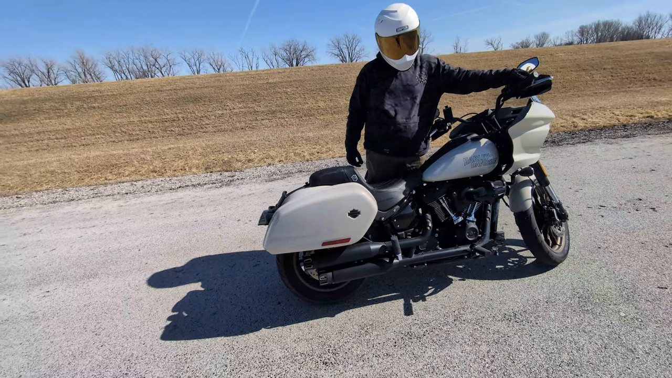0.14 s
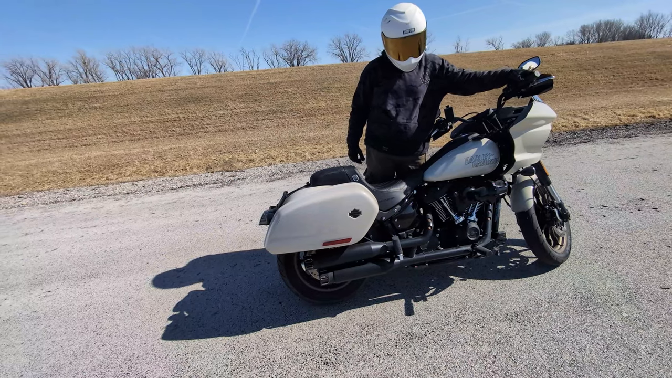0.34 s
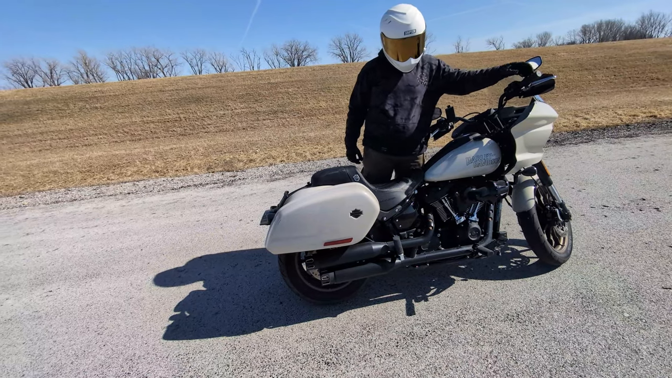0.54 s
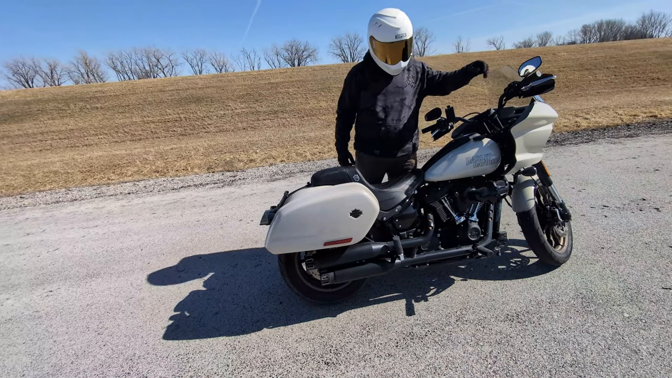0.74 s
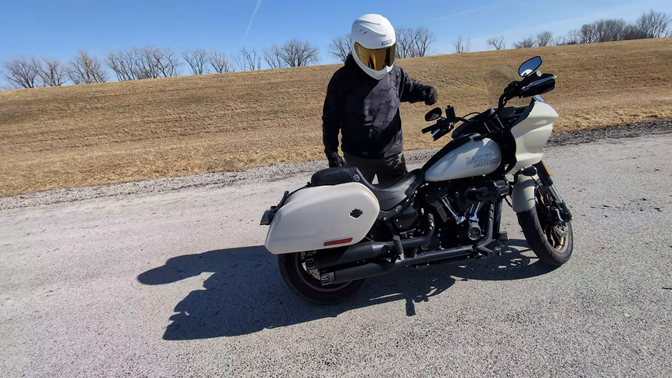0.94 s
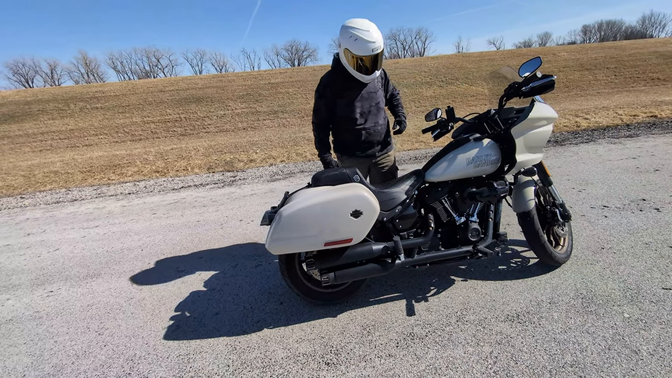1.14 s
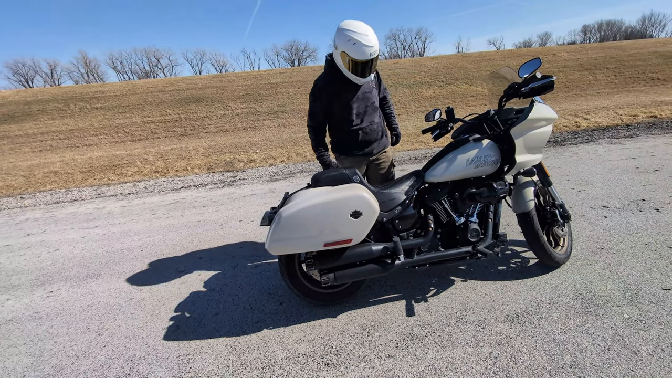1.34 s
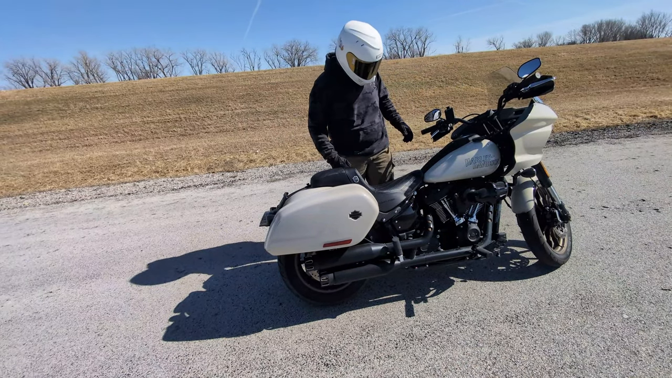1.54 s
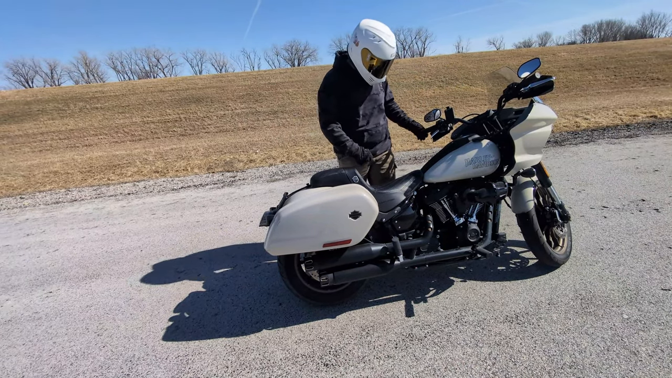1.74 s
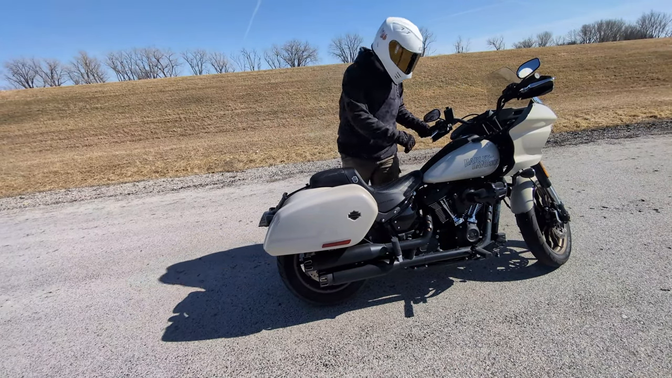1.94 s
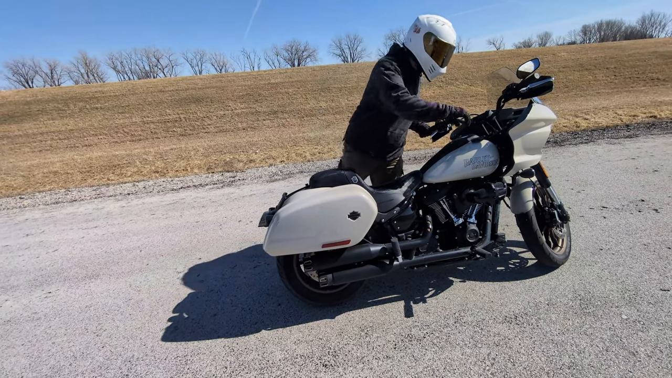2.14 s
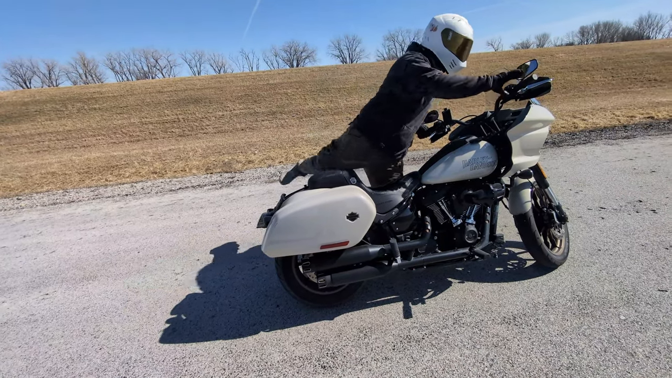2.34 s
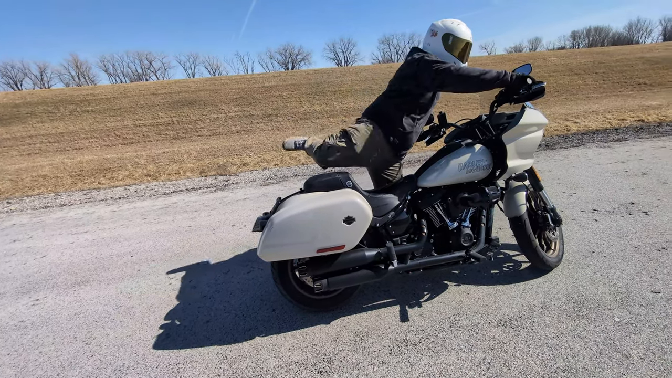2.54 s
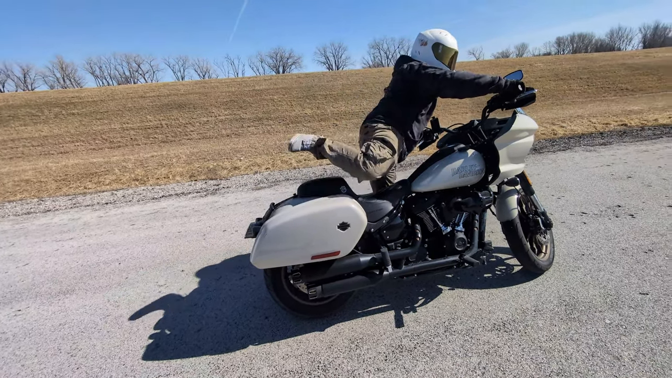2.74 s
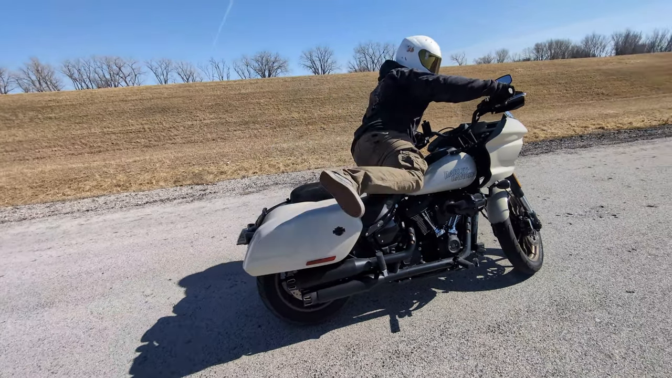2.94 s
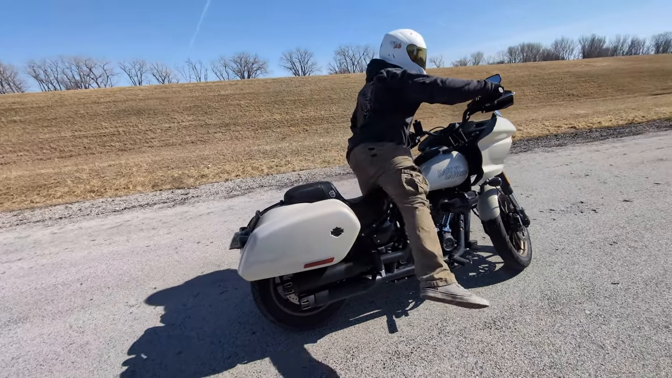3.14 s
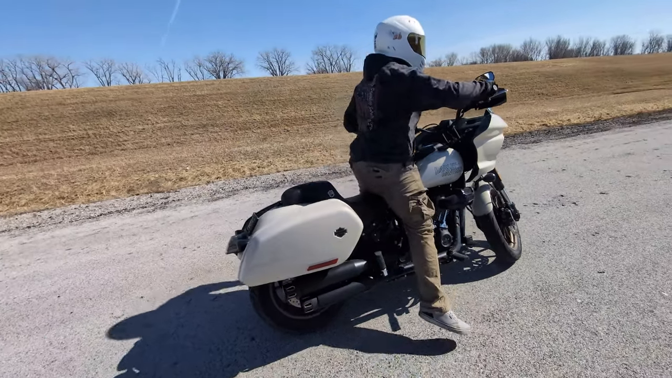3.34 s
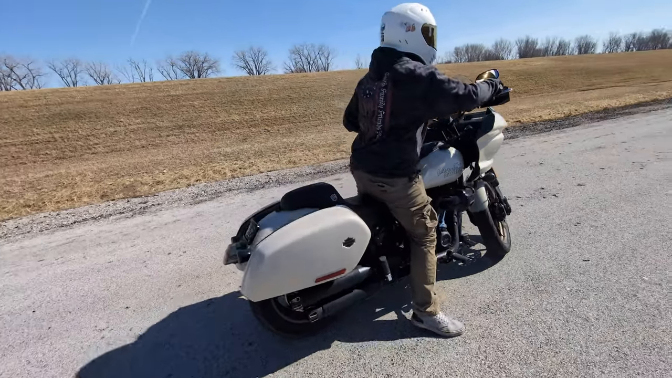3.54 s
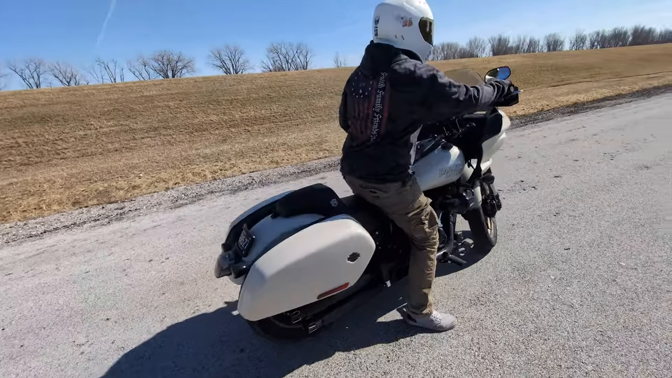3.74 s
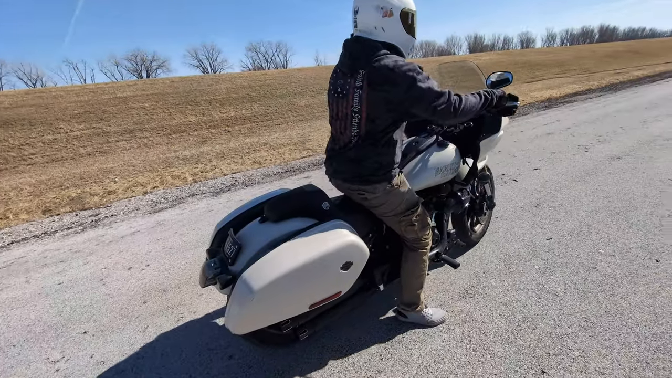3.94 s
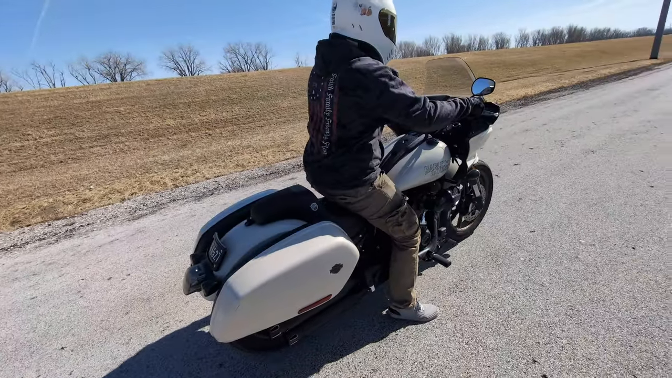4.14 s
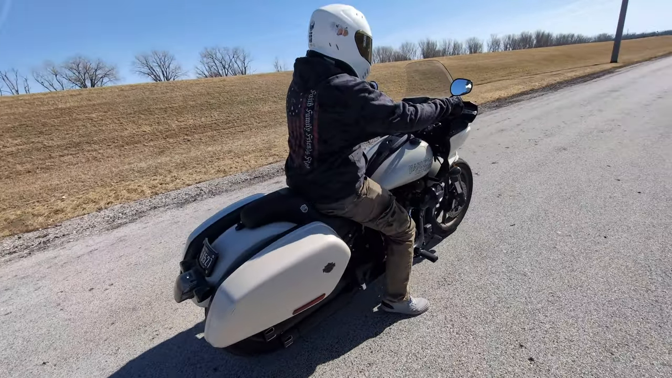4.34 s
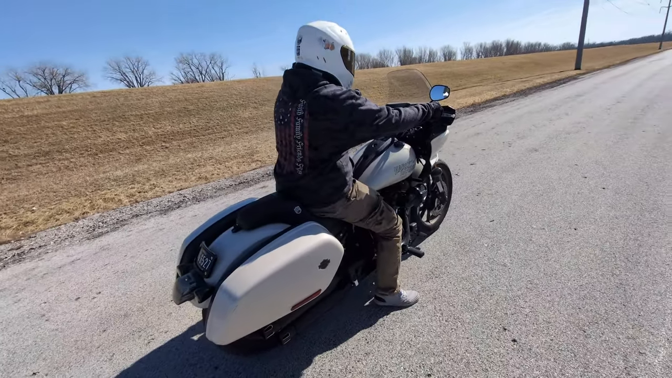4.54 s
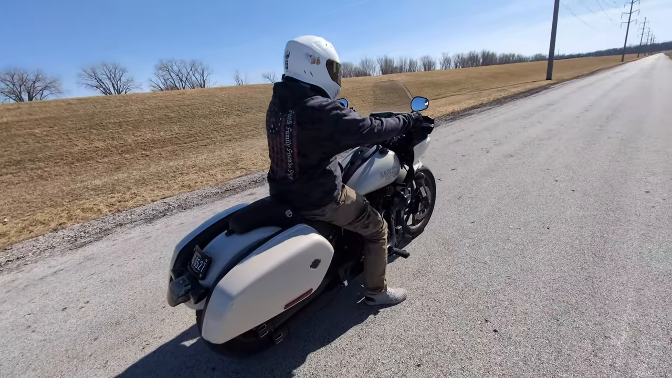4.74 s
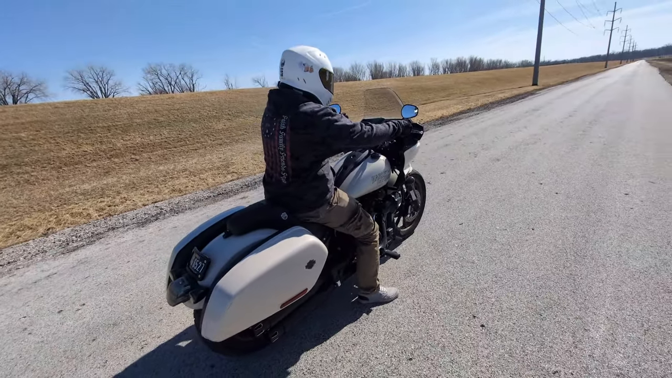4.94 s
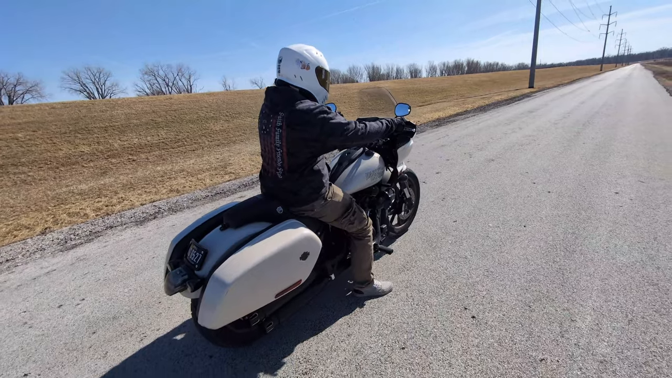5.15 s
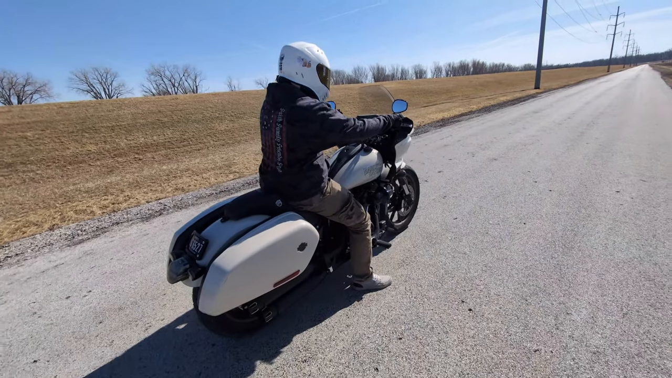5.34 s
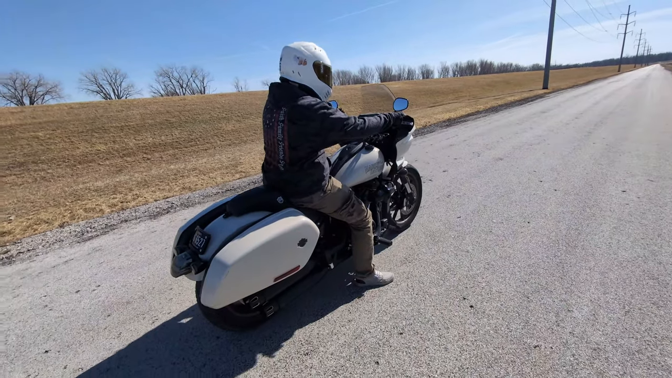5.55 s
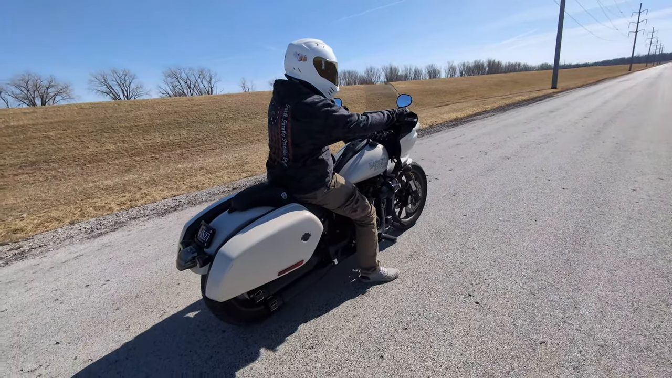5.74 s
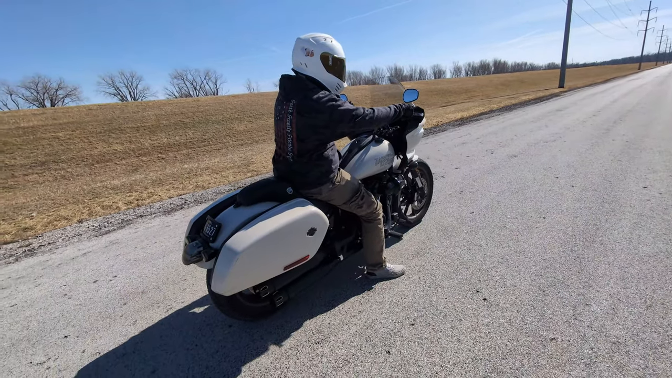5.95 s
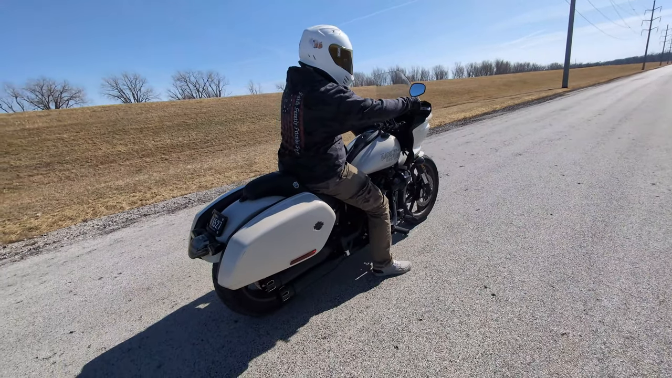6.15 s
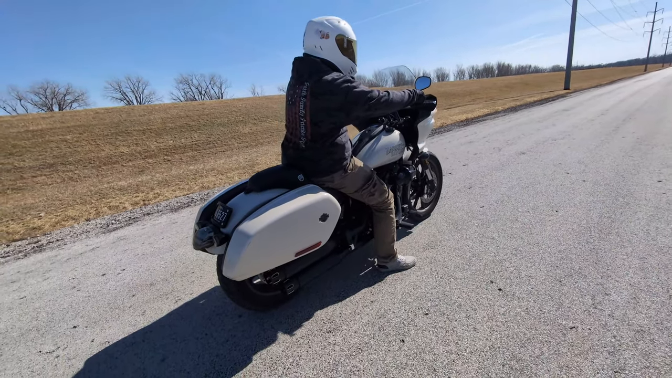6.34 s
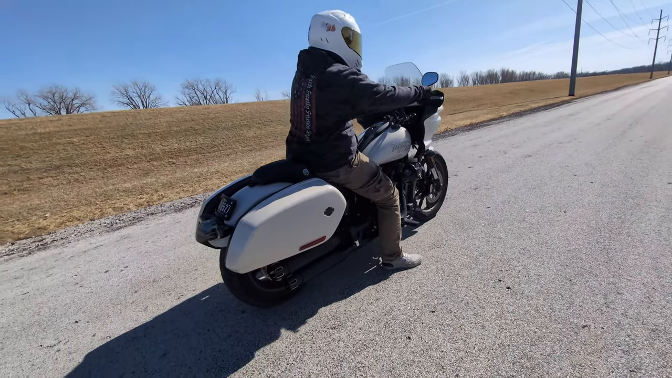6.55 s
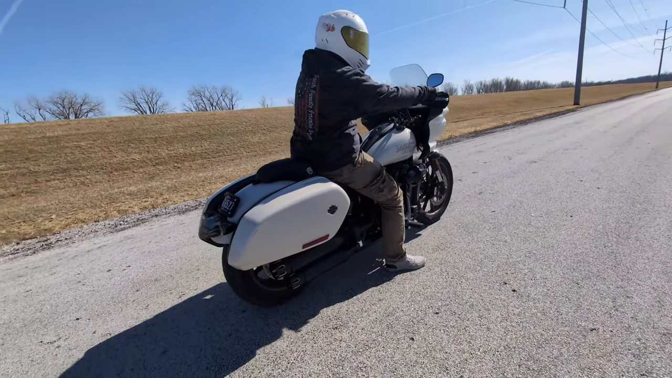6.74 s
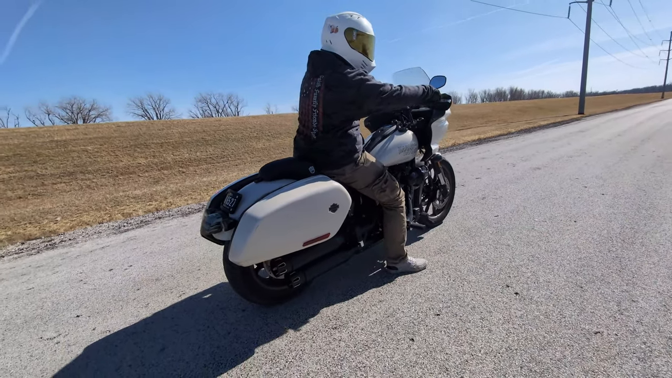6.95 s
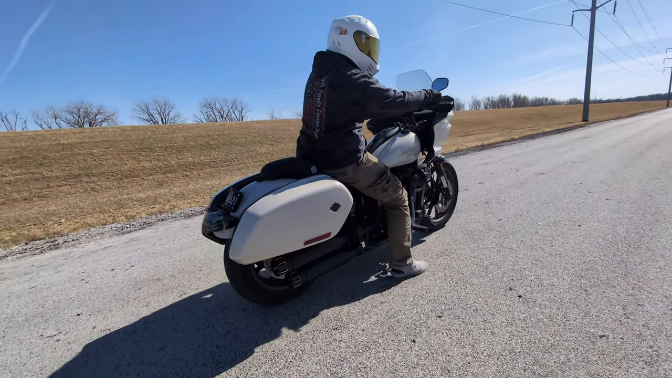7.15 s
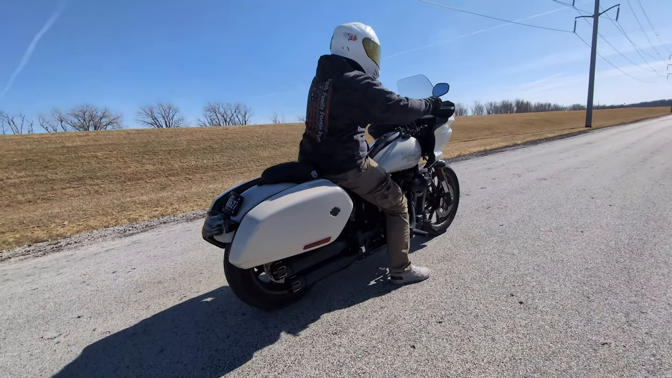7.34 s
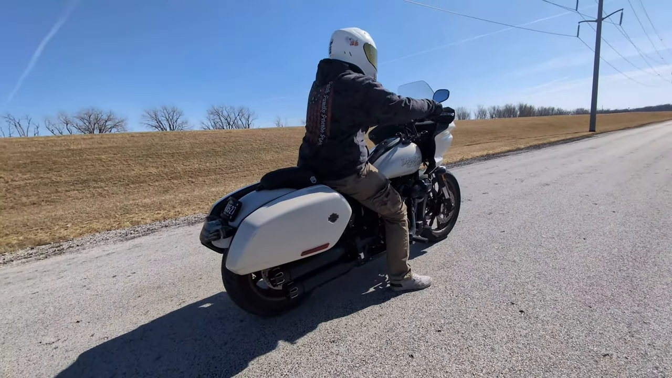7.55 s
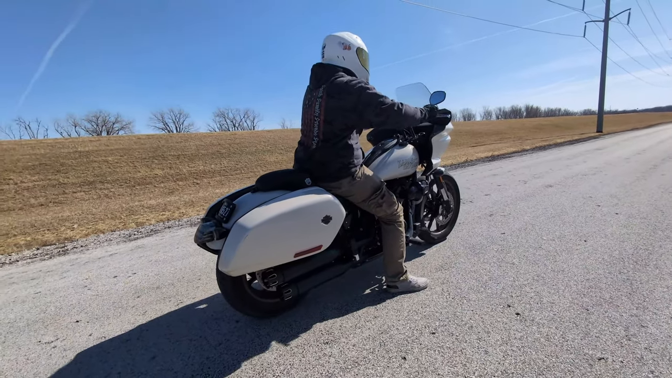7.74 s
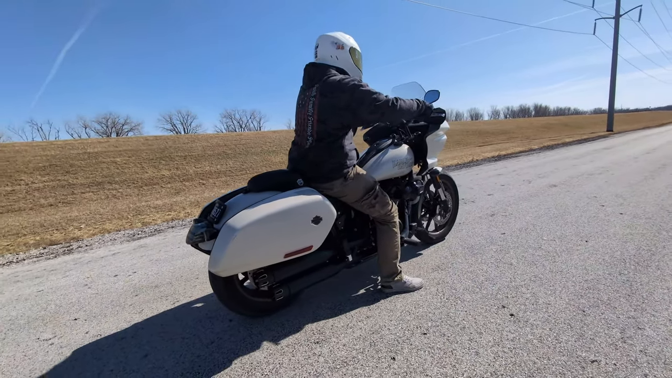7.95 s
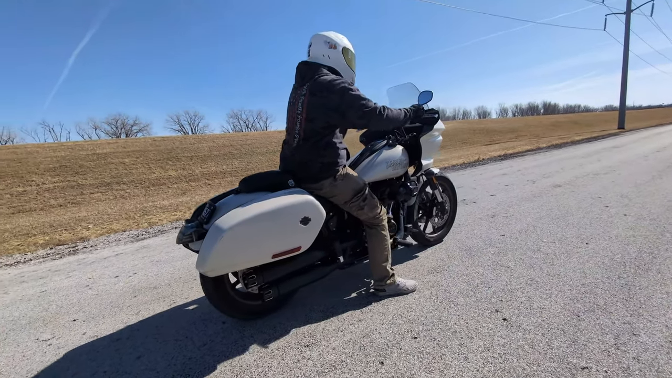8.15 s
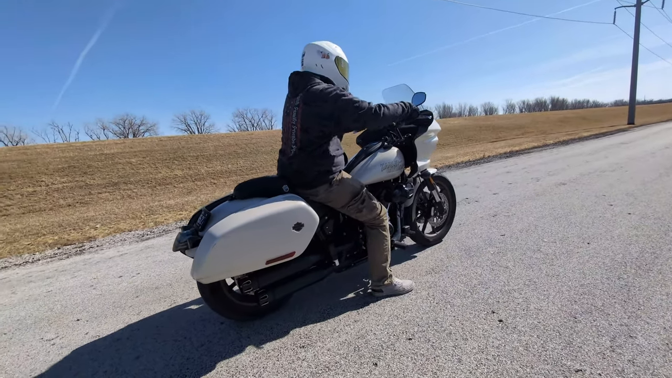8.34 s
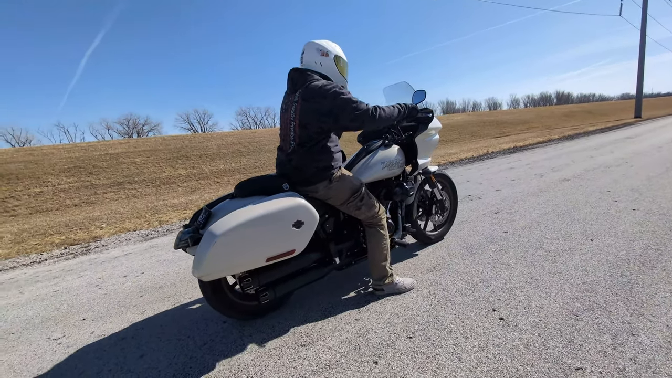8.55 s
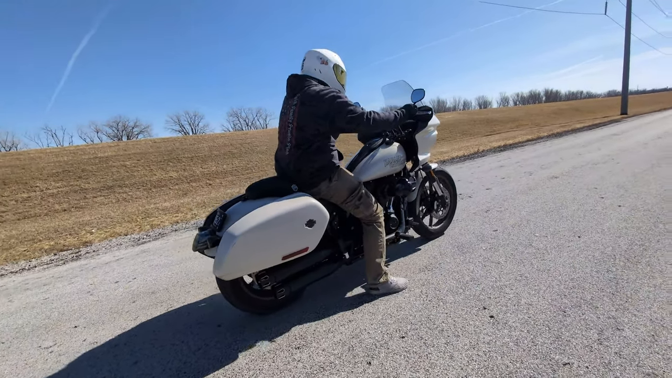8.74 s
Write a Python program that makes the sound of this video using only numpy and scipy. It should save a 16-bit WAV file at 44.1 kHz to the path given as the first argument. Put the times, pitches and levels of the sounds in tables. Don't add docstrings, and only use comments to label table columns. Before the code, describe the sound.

Loud, uneven motorcycle idle on an open road, with ticking valves, a gear clunk, crackling throttle blips and a short tyre squeal at pull-off.

```python
import sys
import numpy as np
from scipy import signal
from scipy.fft import rfft, irfft, next_fast_len
from scipy.io import wavfile
from scipy.ndimage import uniform_filter1d

SR = 44100
rng = np.random.default_rng(int(sys.argv[2]) if len(sys.argv) > 2 else 0)


def store_pcm(level_fs):
    pcm = np.round(np.clip(level_fs, -1, 1) * 32767).astype(np.int16)
    wavfile.write(sys.argv[1], SR, np.atleast_2d(pcm).T)


def magnitude_from_level(level_db):
    exponent = np.asarray(level_db, float) / 20
    return 10 ** exponent


N = 392049
NOW_S = np.arange(N) / SR
OPPOSITE = np.array([[1], [-1]])


def at_hz(points, hz):
    points = np.array(points)
    return np.interp(np.log(hz), np.log(points[:, 0]), points[:, 1])


def colour(x, points):
    size = next_fast_len(N)
    hz = np.maximum(np.arange(size // 2 + 1) * SR / size, 1)
    return irfft(rfft(x, size) * magnitude_from_level(at_hz(points, hz)), size)[..., :N]


def in_time(rows):
    s, *columns = np.transpose(rows)
    return [np.interp(NOW_S, s, column) for column in columns]


def even(x, window_s):
    power = np.mean(np.atleast_2d(x) ** 2, axis=0)
    size = int(window_s * SR)
    slow_power = uniform_filter1d(uniform_filter1d(power, size), size)
    return x / np.sqrt(slow_power + 1e-12)


def filtered(x, order, hz, kind):
    return signal.sosfiltfilt(signal.butter(order, hz, kind, fs=SR, output="sos"), x)


def high_pass(x, hz):
    return signal.sosfilt(signal.butter(3, hz, "high", fs=SR, output="sos"), x)


def clicks(times, heights):
    at = np.round(np.asarray(times) * SR).astype(int)
    inside = (at >= 0) & (at < N)
    return np.bincount(at[inside], np.asarray(heights)[inside], N) + 1e-18


def ring(x, hz, t60):
    r, w = magnitude_from_level(-60 / (t60 * SR)), 2 * np.pi * hz / SR
    return signal.lfilter([0, np.sin(w)], [1, -2 * r * np.cos(w), r * r], x)


def ring_all(x, modes):
    return sum(magnitude_from_level(level_db) * ring(x, hz, t60) for hz, level_db, t60 in modes)


def swell(x, rise_ms, decay_ms):
    rise, decay = np.exp(-1000 / (rise_ms * SR)), np.exp(-1000 / (decay_ms * SR))
    return signal.lfilter([1 - rise], [1, -rise], signal.lfilter([1], [1, -decay], x))


def flicker(rate_hz):
    slow = rng.standard_normal(int(N / SR * 60) + 2)
    slow = np.interp(NOW_S * np.clip(rate_hz, 1, 59), np.arange(len(slow)), slow)
    return slow / slow.std()


def unsteady(hz, t60, window_s):
    return even(ring(rng.standard_normal(N), hz, t60), window_s)


# pitch_hz, likeness [-1 to 1]
EAR_LIKENESS = [(200, 0.96), (600, 0.9), (1200, 0.59), (2200, 0.11), (4000, -0.25), (9000, -0.12),
                (15000, 0.15)]


def stereo_noise(points):
    hz, alike = np.transpose(EAR_LIKENESS)
    alike = np.clip(alike, -.95, .99)
    mid, side = colour(rng.standard_normal((2, N)), points)
    mid = colour(mid, np.c_[hz, 10 * np.log10(1 + alike)])
    side = colour(side, np.c_[hz, 10 * np.log10(1 - alike)])
    return even(np.array([mid + side, mid - side]), 7.3)


def knocks(rows, t60, burst_ms, trim_db):
    out, size = np.zeros((2, N + SR)), SR // 10
    fade = np.exp(-1000 * np.arange(size) / SR / burst_ms)
    for s, peak_db, hz in rows:
        grit = rng.standard_normal((2, size)) * fade
        rung = ring(grit[0] + 0.32 * grit[1] * OPPOSITE, hz, t60)
        first = int(s * SR)
        out[:, first:first + size] += magnitude_from_level(peak_db + trim_db) * rung / np.abs(rung).max()
    return out[:, :N]


# time_s, cycles per second [Hz]; one cycle is two turns of the crank
ENGINE_SPEED = [(0.0, 14.701), (0.3, 12.264), (0.515, 22.829), (1.37, 13.475), (2.01, 8.383), (2.35, 8.303),
                (2.69, 8.465), (3.02, 8.158), (3.36, 8.366), (3.69, 8.016), (4.03, 8.385), (4.36, 8.148),
                (4.7, 8.131), (5.04, 8.14), (5.37, 8.024), (5.71, 8.223), (6.04, 8.104), (6.38, 7.953),
                (6.71, 8.0), (7.05, 8.114), (7.36, 7.994), (7.455, 13.377), (7.815, 14.132), (7.905, 20.73),
                (8.143, 18.03), (8.206, 24.095), (8.242, 18.636), (8.284, 23.634), (8.448, 29.558),
                (8.672, 27.71), (8.694, 20.779), (8.9, 23.206)]


def crank():
    speed, = in_time(ENGINE_SPEED)
    return np.cumsum(speed) / SR, speed


FRONT_LAG = .4375


def cycles():
    turns = crank()[0]
    starts = np.interp(np.arange(int(turns[-1]) + 1), turns, NOW_S)
    length = np.diff(starts, append=2 * starts[-1] - starts[-2])
    return starts, length, np.clip((1 / length - 8.8) / 3, 0, 1)


# share of the cycle, idle_db, speed_db, spread_db, decay_ms
GAS_PUFFS = [(0.024, 11.5, 4, 6, 3.9), (0.404, 6.5, 3, 13, 10), (.12, 2, -8, 12, 4.4),
             (0.1, -35, -27, -24, 1.1), (0.9, 1, -38, 23, 14)]


def puff_gate():
    start, length, heat = cycles()
    gate = 0
    for share, idle_db, speed_db, spread_db, decay_ms in GAS_PUFFS:
        chance_db = np.clip(spread_db, 1, 4) * rng.standard_normal(len(start))
        size_db = idle_db + heat * (speed_db - idle_db) + chance_db
        point = share + 0.05 * heat * (share > 0)
        gate = gate + swell(clicks(start + point * length - .005, magnitude_from_level(size_db)), 0.57, decay_ms)
    return gate


# pitch_hz, level_db, t60_s
COOLING_FINS = [(4300, -22, .008), (5500, -15, .008), (5800, -18, .008), (8140, -21, .005),
                (9500, -18, .005)]


def fins():
    white = rng.standard_normal((2, N))
    out = 0
    for hz, level_db, t60 in COOLING_FINS:
        rung = ring(white, hz, t60)
        out = out + magnitude_from_level(level_db + 3.4 * flicker(14)) * rung / rung.std()
    return out


# pitch_hz, level_db
HISS_SPECTRUM = [(1470, 1), (2500, -3), (3690, -8), (5480, -5.5), (6760, -7.5), (7650, -7.5), (8660, -12.5),
                 (11600, -4), (15200, -13), (16000, -4)]
# cycle rate [Hz], level_db
HISS_LEVEL = [(8, -13), (11, -2), (20, 0.5), (28, -4)]
# time_s, level_db
FINS_SHOWING = [(0, -5), (3.2, 3), (4.5, -8), (8.89, -7)]


def hiss(gate, case_db):
    speed = crank()[1]
    rush = stereo_noise(HISS_SPECTRUM) + magnitude_from_level(in_time(FINS_SHOWING)[0]) * fins()
    swells = 1 + 0.33 * np.clip((speed - 10) / 5, 0, 1) * (even(gate, .12) - 1)
    return magnitude_from_level(case_db + at_hz(HISS_LEVEL, speed)) * rush * swells


# time_s, low_mesh_db, high_mesh_db, middle_mesh_db
GEAR_WHINE = [(.9, -130, -130, -130), (1.2, -72, -90, -90), (1.4, -64, -80, -82), (1.55, -62, -74, -69),
              (1.67, -62, -65, -76), (1.78, -54, -78, -90), (1.93, -63, -110, -110),
              (2.1, -130, -130, -130)]
MESHES_PER_CYCLE = [160.0, 500.0, 335.0]


def whine():
    out, turns = 0, crank()[0]
    for teeth, level_db in zip(MESHES_PER_CYCLE, in_time(GEAR_WHINE)):
        flutter = unsteady(45, 0.022, 1)
        tone = np.sin(2 * np.pi * teeth * turns + .8 * flutter)
        out = out + magnitude_from_level(level_db + 2.5) * (1 + .7 * flutter) * tone
    return out


# pitch_hz, level_db, t60_s
ENGINE_COVERS = [(1350, -25, 0.04), (2020, -34.5, 0.072), (2500, -35, 0.0067), (1133, -33, 0.076),
                 (2670, -38, .04)]
# pitch_hz, level_db per Hz
IDLE_CLATTER = [(140, 0.5), (230, 2), (270, -13), (340, -16), (410, -27), (490, -14), (650, -12.5),
                (700, -20), (741, -21), (904, -25.5), (1330, -19), (1540, -24), (2450, -28), (2880, -28.5),
                (4500, -38.5), (5850, -74), (9900, -120)]
# pitch_hz, level_db per Hz
REVVED_CLATTER = [(140, 6.5), (240, 7.5), (471, -15.5), (595, -1), (1440, -20.5), (1550, -11), (2210, -16),
                  (2410, -15), (2720, -16), (3230, -15.5), (4500, -38), (5850, -73), (9900, -120)]
# pitch_hz, level_db, t60_s
PIPE_MOUTH = [(675, -6, 0.035), (585, -7, 0.035), (3270, -20.5, 0.04), (3950, -22.5, 0.021)]
# share of the cycle, level_db
MOUTH_WAVES = [(.41, -6.5), (.76, -9), (0.0852, -14.5)]


def clatter(gate, clatter_db):
    start, length, heat = cycles()
    revved = np.interp(NOW_S, start, heat)
    white = rng.standard_normal((2, N))
    covers = 0
    for k, (hz, level_db, t60) in enumerate(ENGINE_COVERS):
        covers = covers + magnitude_from_level(level_db + 3 * flicker(22)) * even(ring(white[k % 2], hz, t60), 5.8)
    idle = stereo_noise(IDLE_CLATTER) + covers
    rattle = (1 - revved) * idle + revved * stereo_noise(REVVED_CLATTER)
    mouth = 0
    for hz, level_db, t60 in PIPE_MOUTH:
        for share, wave_db in MOUTH_WAVES:
            chance_db = rng.normal(0, 1.8, len(start))
            strength = (1 - heat) * magnitude_from_level(level_db + wave_db - 3.5 + chance_db)
            wave = swell(clicks(start + share * length, strength), 90 / hz, 220 / hz)
            mouth = mouth + ring(wave, hz, t60)
    mouth = high_pass(mouth, 470)
    shaken = .9 - .4 * revved + (.2 + .4 * revved) * even(gate, .12)
    return magnitude_from_level(clatter_db + 4.5) * (rattle * shaken + mouth)


# time_s, peak_db, pitch_hz
NEAR_VALVE_KNOCKS = [(2.2023, -51, 3050), (2.3255, -48, 2930), (2.566, -47, 2500), (2.802, -45, 2970),
                     (2.9232, -40, 3270), (3.0454, -48, 3120), (3.2874, -43, 2580), (3.3402, -39, 2840),
                     (3.409, -40, 3090), (3.4585, -45, 2580), (3.5285, -35.5, 3210), (3.5807, -38, 2610),
                     (3.6475, -45, 3320), (3.7753, -40, 2760), (3.827, -38, 3190), (3.8975, -39, 3100),
                     (4.0721, -35, 2920), (4.14, -39, 3240), (4.3085, -47, 2560), (4.5041, -40, 2600),
                     (4.555, -44, 2500), (4.6273, -40, 2720), (4.6812, -37, 2690), (5.2409, -51, 2820)]
# time_s, peak_db, pitch_hz
MORE_VALVE_KNOCKS = [(2.133, -42, 2640), (2.376, -46, 2510), (2.4448, -51, 3490), (2.6189, -43, 2900),
                     (2.9746, -46, 2580), (3.1677, -47, 3150), (4.0073, -47, 2580), (4.2577, -53, 2790),
                     (4.367, -43, 2570), (4.8035, -39, 2710), (4.875, -39, 2800), (5.4904, -36, 3290),
                     (5.6126, -40, 2720), (5.7334, -38, 3610), (5.8586, -37.5, 3330), (5.912, -42, 2580),
                     (5.9803, -46, 2580), (6.104, -37, 2540), (6.1559, -47, 2980), (6.2248, -42, 2800),
                     (6.354, -39, 3700), (6.4063, -44, 2730), (6.4787, -40, 3300), (6.6014, -35, 2780),
                     (6.6553, -35, 2820), (6.8543, -41, 3410), (6.9087, -39, 3050), (6.9795, -37, 3290),
                     (7.1023, -45, 3140), (7.1541, -33, 2770), (7.2245, -42, 2760), (7.2759, -40, 2990)]
# pitch_hz, level_db, t60_s
ROCKER_COVER = (3320, -8, 0.013)


def tappets():
    hz, level_db, t60 = ROCKER_COVER
    cover = [(s, db + level_db, hz) for s, db, _ in NEAR_VALVE_KNOCKS + MORE_VALVE_KNOCKS]
    out = knocks(NEAR_VALVE_KNOCKS, .025, 2.3, trim_db=-2.0)
    out = out + knocks(MORE_VALVE_KNOCKS, .025, 2.6, trim_db=-5.5)
    return out + knocks(cover, t60, 1.8, trim_db=0)


def metal_hits(hits, modes):
    s, peak_db, crack_db = np.transpose(hits)
    grit = rng.standard_normal((2, N))
    blow = swell(clicks(s, magnitude_from_level(peak_db - 29.5)), 0.095, 7.9) * grit[0]
    crack = swell(clicks(s, magnitude_from_level(crack_db)), 1.0, 2.6)
    crack = crack + swell(clicks(s, magnitude_from_level(crack_db - 15.0)), 4.7, 36)
    crackle = colour(grit, [(400, 1), (1000, 8.5), (4000, 2.0), (15000, -13.0)])
    return ring_all(blow, modes) + crack * crackle


def squeal(hz, level_db, octave_db, rough):
    wobble, throb = unsteady(70, 0.042, 0.87), unsteady(55, 0.042, 0.87)
    phase = 2 * np.pi * np.cumsum(hz) / SR + rough * wobble
    tone = np.sin(phase) + magnitude_from_level(octave_db) * np.sin(2 * phase + 0.9 * throb)
    return np.sqrt(2) * magnitude_from_level(level_db) * (1 + 0.35 * throb) * tone


# time_s, peak_db, crack_db
STAND_HITS = [
    (5.39, -20, -26),
]
# pitch_hz, level_db, t60_s
STAND_STEEL = [(1030, -14, .04), (1240, -4, 0.03), (2900, -1.5, 0.03), (3270, -8, 0.03), (5570, -2, 0.022),
               (10100, -6, 0.012)]
# time_s, peak_db, crack_db
GEAR_HITS = [
    (6.725, -20.5, -17.5),
    (6.776, -32, -33),
    (6.786, -37, -58),
]
# pitch_hz, level_db, t60_s
GEAR_STEEL = [(544, -1, 0.043), (880, 3.5, 0.026), (1670, 1, 0.04), (2160, 0, 0.018), (3990, -4, 0.034),
              (5600, -14, 0.056), (7500, -20, 0.042)]
# time_s, pitch_hz, level_db
SQUEAK = [(6.655, 4900, -130), (6.665, 4900, -66), (6.678, 5100, -57), (6.688, 5250, -55),
          (6.7, 5250, -130)]


def rider():
    hits = metal_hits(STAND_HITS, STAND_STEEL) + metal_hits(GEAR_HITS, GEAR_STEEL)
    return hits + squeal(*in_time(SQUEAK), -40, rough=0.58)


# time_s, pitch_hz, level_db, octave_db against the tone
TYRE_CHIRP = [(8.65, 1300, -40, -10), (8.672, 1204, -13.5, -17), (8.69, 1322, -26.5, -18),
              (8.728, 1310, -41, -16), (8.75, 1230, -32, 0), (8.786, 1265, -26.5, -17),
              (8.826, 1305, -26.5, -5), (8.884, 1226, -24, -7.5), (8.89, 1263, -20, -18)]


def tyre():
    spinning = np.clip((NOW_S - TYRE_CHIRP[0][0]) / .01, 0, 1)
    chirp = spinning * squeal(*in_time(TYRE_CHIRP), rough=0.42)
    both = np.array([chirp, np.roll(chirp, 5) * (spinning > 0)])
    return both * magnitude_from_level([[-1.2], [1.2]])


# time_s, peak_db
FIRST_SHIELD_HITS = [(0.0458, -40), (0.1045, -28), (0.1366, -36), (0.172, -42), (0.2354, -44),
                     (0.2668, -38), (0.3371, -50), (0.3641, -17.5), (0.394, -21), (0.4259, -20.5),
                     (0.4489, -28), (0.4768, -33), (0.4963, -24), (0.5212, -30), (0.5482, -31),
                     (0.5686, -27), (0.5911, -28), (0.6185, -42), (0.635, -42), (0.6644, -36),
                     (0.6809, -26), (0.7023, -32), (0.7282, -24.5), (0.7562, -32), (0.7756, -30),
                     (0.8005, -26), (0.856, -29), (0.8744, -31), (0.9103, -41), (0.931, -35), (0.9657, -36),
                     (0.9867, -28), (1.0241, -40), (1.043, -42), (1.075, -40), (1.1069, -43), (1.1443, -43),
                     (1.1712, -36), (1.2072, -50), (1.2311, -38), (1.276, -44), (1.3204, -46),
                     (1.3698, -42), (1.4122, -41), (1.493, -38), (1.5843, -54), (1.7025, -49),
                     (1.7574, -39)]
# time_s, peak_db
LATER_SHIELD_HITS = [(7.3868, -21), (7.402, -17), (7.4307, -23), (7.45, -14.5), (7.4815, -23), (7.517, -22),
                     (7.5948, -22), (7.6313, -27), (7.6737, -38), (7.697, -26), (7.7914, -29),
                     (7.8127, -18.5), (7.8423, -14), (7.8752, -12.5), (7.897, -29), (7.9244, -23),
                     (7.9735, -29), (8.0304, -38), (8.0787, -28), (8.1261, -17), (8.1521, -30),
                     (8.179, -19.5), (8.2065, -29), (8.2269, -24), (8.2498, -12), (8.275, -24),
                     (8.2962, -33), (8.3187, -40), (8.3342, -40), (8.3544, -32), (8.3945, -36),
                     (8.4299, -29), (8.4773, -26), (8.5113, -26), (8.5457, -19), (8.5811, -19),
                     (8.6031, -29), (8.617, -20.5), (8.6549, -17), (8.692, -15), (8.7193, -24),
                     (8.7397, -17), (8.7841, -26), (8.8108, -24), (8.842, -22), (8.864, -21)]
# pitch_hz, level_db, t60_s
SHIELD_PLATES = [(1660, -10, 0.026), (2450, -5, 0.021), (3200, -6.5, 0.013), (850, -9, .012)]
# pitch_hz, level_db, t60_s
SHIELD_PLATES_BEHIND = [(1930, -12.5, 0.017), (2500, -11, 0.0083), (3150, -9.5, 0.009),
                        (890, -12.5, 0.0085)]


def shields(hits, modes):
    s, peak_db = np.transpose(hits)
    chance, grit = rng.standard_normal((len(s), len(modes))), rng.standard_normal((2, N))
    wide_grit = grit[0] + 0.28 * grit[1] * OPPOSITE
    out = 0
    for k, (hz, level_db, t60) in enumerate(modes):
        strength = magnitude_from_level(peak_db + level_db - 17 + 3.3 * chance[:, k])
        out = out + ring(swell(clicks(s, strength), 0.28, 2.34) * wide_grit, hz, t60)
    return out


# pitch_hz, level_db per Hz
IDLE_SPIT = [(1180, -60), (2000, 2), (2880, -2.5), (3120, 0.5), (5030, -3.5), (5540, -5.5), (6470, -3.5),
             (9410, -1), (11700, 8.5), (16000, -10)]


def puffs(gate, puff_db):
    return magnitude_from_level(np.minimum(puff_db, -44) + 5.0) * even(gate, 0.2) * stereo_noise(IDLE_SPIT)


# time_s, peak_db, pitch_hz
LATE_CHARGES = [(0.495, -22, 1820), (0.521, -20, 1680), (0.547, -26, 2410), (0.569, -28, 2300),
                (0.591, -28, 2470), (0.68, -28, 1560), (0.709, -24, 1480), (0.728, -27, 1620),
                (0.755, -23, 1670), (0.807, -19.5, 1620), (0.856, -26, 1620), (0.909, -40, 1600),
                (0.988, -34, 2570), (1.229, -39, 2040), (1.275, -49, 2518), (1.37, -37, 2260),
                (1.412, -38, 2180), (1.492, -31.5, 1610), (7.593, -18.5, 2030), (7.625, -26, 1970),
                (7.695, -45, 1995), (7.972, -22.5, 1370), (8.079, -32, 2500), (8.432, -20, 1410),
                (8.477, -22, 3240), (8.51, -23, 1500), (8.544, -20, 2050)]
# pitch_hz, level_db, t60_s
LOW_BARK = [(342, -6, 0.022), (740, -3.5, 0.0089)]
# pitch_hz, level_db per Hz
TEAR_COLOUR = [(180, -26), (300, 14.5), (478, -18.5), (656, -4.5), (1060, -7.5), (1230, -63), (1480, -5.5),
               (1640, -10.5), (2700, -10), (3190, -12), (4230, -16), (11900, -6), (16000, -8.5)]


def backfires():
    s, peak_db, _ = np.transpose(LATE_CHARGES)
    burst = swell(clicks(s, magnitude_from_level(peak_db)), 0.67, 6.1)
    bark = 0
    for hz, level_db, t60 in LOW_BARK:
        bark = bark + magnitude_from_level(level_db - 26.0) * ring(burst * rng.standard_normal(N), hz, t60)
    tear = magnitude_from_level(-7.5) * burst * stereo_noise(TEAR_COLOUR)
    return knocks(LATE_CHARGES, .024, 0.84, trim_db=-6.5) + tear + bark


# time_s, peak_db, pitch_hz
HARD_FIRINGS = [(0.362, -16.5, 620), (0.393, -17, 720), (0.423, -14, 633), (0.475, -16, 853),
                (0.493, -12, 721), (7.447, -27, 670), (7.483, -28, 643), (7.517, -13.5, 665),
                (7.811, -16.5, 1280), (7.84, -23, 1240), (7.873, -12.5, 1205), (7.924, -23, 1250),
                (8.126, -33, 754), (8.183, -16, 1280), (8.248, -10, 760), (8.277, -13.5, 646),
                (8.318, -13, 676), (8.334, -13, 1200), (8.354, -9, 1290), (8.371, -12, 670)]


def barks():
    return knocks(HARD_FIRINGS, 0.026, 3.5, trim_db=-5.5)


# from_s, to_s, crack peak_db, fall after closing [dB per s]
THROTTLE_OPEN = [
    (0.365, 0.469, -14.5, 260),
    (7.39, 7.498, -11, 400),
    (7.81, 7.9, -11.5, 297),
    (8.127, 8.128, -14.5, 800),
    (8.178, 8.182, -16.5, 1500),
    (8.213, 8.353, -13.5, 248),
    (8.57, 8.656, -21.5, 300),
    (8.695, 8.888, -13.5, 300),
]
# pitch_hz, level_db, t60_s
SILENCER_SHELL = [(300, 5, 0.027), (678, -1, 0.035), (448, -2, .02), (1215, 5.5, 0.024),
                  (1960, -7.5, 0.063), (2940, -0.5, 0.0065)]
# pitch_hz, level_db, t60_s
SILENCER_BAFFLES = [(1570, -16, 0.021), (2240, -6, 0.021)]
OVERRUN_DB, OVERRUN_SPREAD_DB, OPEN_SPREAD_DB = -37, 3, 1.2
OVERRUN_DB_PER_OCTAVE, POPS_FULL_HZ = 13, 20.2
FRONT_CRACK_DB, FRONT_RING_DB = -1.5, -5
RING_DB, OVERRUN_RING_DB = -5.5, 3.5
OPENING_DB_PER_S = 909
LAST_PULL_S, LAST_PULL_RING_LOSS_DB = 8.56, 7


def cracks():
    turns, speed = crank()
    phase = (np.arange(int(turns[-1]) + 1)[:, None] + [0, FRONT_LAG]).ravel()
    s, front = np.interp(phase, turns, NOW_S), phase % 1 > 0
    heat = np.repeat(cycles()[2], 2)
    chance = rng.standard_normal((len(s), 3))

    opens, shuts, open_db, fall = np.transpose(THROTTLE_OPEN)[..., None]
    before_db = OPENING_DB_PER_S * np.maximum(opens - s, 0)
    after_db = fall * np.maximum(s - shuts, 0)
    load_db = np.max(open_db - before_db - after_db, axis=0)

    pop_hz = np.minimum(np.interp(phase, turns, speed), POPS_FULL_HZ)
    pop_db = OVERRUN_DB + OVERRUN_SPREAD_DB * chance[:, 0] + 20 * np.log10(heat + 1e-6)
    pop_db = pop_db + OVERRUN_DB_PER_OCTAVE * np.log2(pop_hz / 20)
    peak_db = np.maximum(load_db + OPEN_SPREAD_DB * chance[:, 1] + FRONT_CRACK_DB * front, pop_db)
    ring_db = np.maximum(load_db + RING_DB + FRONT_RING_DB * front, pop_db + OVERRUN_RING_DB)
    ring_db = ring_db - 3 + 2.5 * chance[:, 2] - LAST_PULL_RING_LOSS_DB * (s > LAST_PULL_S)

    tear = swell(clicks(s, magnitude_from_level(peak_db - 1.5)), 0.7, 4.66) * stereo_noise(TEAR_COLOUR)
    blow = swell(clicks(s, (heat > 0) * magnitude_from_level(ring_db - 25.5)), 0.94, 2.8) * rng.standard_normal(N)
    pop = swell(clicks(s, magnitude_from_level(pop_db - 24.0)), 0.23, 1.7) * rng.standard_normal((2, N))
    baffles = 0
    for k, (hz, level_db, t60) in enumerate(SILENCER_BAFFLES):
        wide_pop = pop[k] + 0.53 * pop[1 - k] * OPPOSITE
        baffles = baffles + magnitude_from_level(level_db) * ring(wide_pop, hz, t60)
    return tear + baffles + ring_all(blow, SILENCER_SHELL)


# cycle rate [Hz], share of the cycle, depth [0-1]
PIPE_SURGE = [(9, .7, 0), (12.5, .74, .7), (14.5, .58, .75), (17, .44, .7), (21, .36, .5), (25, .36, 0)]


def surge():
    turns, speed = crank()
    rate, share, depth = np.transpose(PIPE_SURGE)
    peak_at = np.interp(speed, rate, share)
    return 1 + np.interp(speed, rate, depth) * np.cos(2 * np.pi * (turns - peak_at))


# multiple of the cycle rate, level_db
MULTIPLES = [(2, 10), (3, 6), (4, -1), (5, 4.5), (6, -2.5), (7, -7.5), (8, -2), (9, -9.5), (10, -1.5),
             (11, -9), (12, -29), (13, -5.5), (14, -12), (15, -8), (16, -9), (18, -14.5), (20, -13.5)]
# pitch_hz, level_db
PIPE_SPECTRUM = [(30, -21), (45, -23), (51, -18), (58, 3), (80, 12), (115, -3), (125, -4), (150, 1),
                 (200, -4), (300, -11.5)]
# time_s, lift of the lowest multiples [dB],
# boom above 110 Hz [dB]
BOOM_BALANCE = [(0, -3, -2.5), (.48, -5, 3.5), (.58, 10.5, 0), (.88, 3, -6.5), (1.0, 14, -4.5),
                (1.4, -2, 1.5), (1.9, -3, -1), (7.3, 0, 0), (7.9, -10, 1.5), (8.15, 8, -4), (8.25, -5, 3),
                (8.89, -5, 4.5)]
PIPE_TRANSIT_S = .0165


def orders():
    turns, speed = crank()
    out, lift_db = 0, in_time(BOOM_BALANCE)[0]
    at_mouth = turns - PIPE_TRANSIT_S * speed
    for multiple, level_db in MULTIPLES:
        pair = np.angle(1 + 0.99 * np.exp(-2j * np.pi * multiple * FRONT_LAG))
        waver = unsteady(5, .12, 2)
        level_db = level_db + at_hz(PIPE_SPECTRUM, multiple * speed) + 2.0 * waver
        level_db = level_db + (multiple < 4) * lift_db
        out = out - magnitude_from_level(level_db) * np.sin(2 * np.pi * multiple * at_mouth + pair + .3 * waver)
    return even(out, 0.1) * np.clip((speed - 9.3) / 3, 0, 1)


# pitch_hz, level_db, t60_s, start after the puff [ms]
REAR_PIPE = [(58.7, 0.1, 0.2, -7.0), (67.4, -0.1, 0.108, -14.45), (95.4, 3.1, 0.051, -9.4),
             (133.7, -14.0, 0.2, -11.85), (191.9, -8.6, 0.018, -15.8)]
# pitch_hz, level_db, t60_s, start after the puff [ms]
FRONT_PIPE = [(72.6, 5.5, 0.146, -6.65), (79.2, 4.5, 0.2, -11.85), (131.5, 5.4, 0.013, -0.55),
              (161.2, -12.1, 0.2, -14.3), (201.8, -18, 0.141, -12.95),
              (200.9, -3.5, 0.012, -3.05)]
IDLE_HUNT_S = .0013


def idle_pipes():
    start, length, heat = cycles()
    front = start + FRONT_LAG * length - .002
    out = 0
    for fired, modes in ((start, REAR_PIPE), (front, FRONT_PIPE)):
        charge_db = rng.normal(0, .9, len(fired))
        for hz, level_db, t60, late_ms in modes:
            scatter_db = rng.normal(0, .6, len(fired))
            strength = (1 - 0.89 * heat) * magnitude_from_level(level_db + charge_db + scatter_db)
            out = out + ring(clicks(fired + late_ms / 1000, strength), hz, t60)
    hunt_s = np.interp(NOW_S, start, IDLE_HUNT_S * rng.standard_normal(len(start)))
    return np.interp(NOW_S + hunt_s, NOW_S, out)


def boom(low_db, upper_db):
    glide = orders()
    rasp = even(filtered(glide, 2, [235, 480], "band"), 0.36) * np.clip((crank()[1] - 11) / 5, 0, 1)
    both = high_pass(idle_pipes(), 52) + magnitude_from_level(1.0) * glide
    both = filtered(both, 4, [44, 235], "band")
    low = filtered(both, 4, 110, "low")
    swelling = surge()
    lower = even(low * swelling, 0.07)
    upper = even((both - low) * swelling ** 0.32, 0.18)
    mid = magnitude_from_level(low_db) * (lower + magnitude_from_level(upper_db) * upper + magnitude_from_level(upper_db - 18) * rasp)
    mid = filtered(mid, 3, 43, "high")
    return mid + magnitude_from_level(-27.0) * np.roll(mid, 130) * OPPOSITE


# time_s, exhaust_db, engine case_db
LISTENER_LEVELS = [(0.0, -13, -32.5), (0.22, -19, -42), (0.37, -18, -39), (0.59, -15, -33.5),
                   (1.46, -21.5, -46), (2.15, -26.5, -47), (3.37, -20, -41), (4.48, -17.5, -39),
                   (7.13, -18, -40), (7.72, -15.5, -36), (7.75, -20, -40.5), (8.1, -14.5, -34),
                   (8.34, -21, -38), (8.42, -14, -31.5), (8.62, -16.5, -30), (8.77, -21.5, -38.5),
                   (8.89, -20.5, -35)]
# cycle rate [Hz], level_db
UPPER_BOOM_LEVEL = [(8, -8), (15, -6), (21, 1), (28, 1)]
# time_s, level_db
SPIT_LEVEL = [(0, -41.5), (1.8, -43), (2.3, -38), (5.9, -38.5), (7.2, -34), (8.89, -47)]


def scene():
    exhaust_db, case_db = in_time(LISTENER_LEVELS)
    upper_db = at_hz(UPPER_BOOM_LEVEL, crank()[1]) + in_time(BOOM_BALANCE)[1]
    low_db = exhaust_db - 0.5 - 10 * np.log10(1 + magnitude_from_level(2 * upper_db))
    gate = puff_gate()
    engine = hiss(gate, case_db) + whine() + clatter(gate, case_db) + tappets()
    engine = engine + shields(FIRST_SHIELD_HITS, SHIELD_PLATES)
    engine = engine + shields(LATER_SHIELD_HITS, SHIELD_PLATES_BEHIND)
    exhaust = puffs(gate, exhaust_db + in_time(SPIT_LEVEL)[0]) + backfires() + barks()
    exhaust = exhaust + cracks() + boom(low_db, upper_db)
    return (engine + exhaust + rider() + tyre()) * magnitude_from_level([[-.45], [.45]])


def roll_off(x):
    return signal.sosfilt(signal.butter(12, 16670, fs=SR, output="sos"), x)


# pitch_hz, level_db
LEFT_EAR = [(9500, 0), (12500, -3)]


def record(dry):
    dry = np.array([colour(dry[0], LEFT_EAR), dry[1]])
    soft = 1.181 * dry / (1 + (dry / 0.44) ** 4) ** 0.23
    top_cut = signal.cheby2(10, 50, 16500, fs=SR, output="sos")
    return roll_off(signal.sosfilt(top_cut, soft))


dry = scene()
out = record(dry)
store_pcm(out)
```